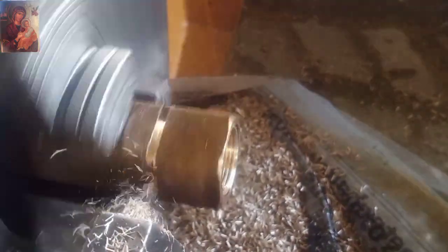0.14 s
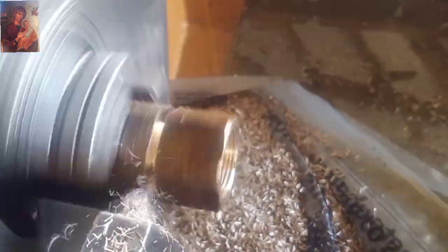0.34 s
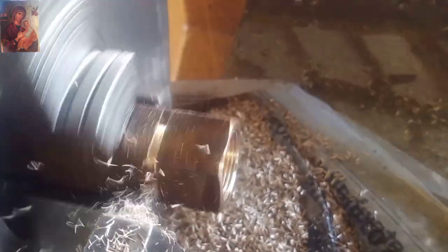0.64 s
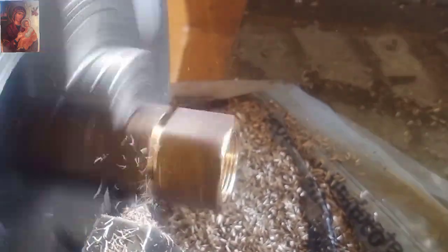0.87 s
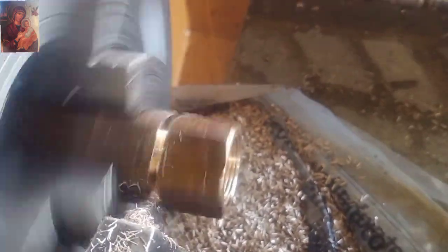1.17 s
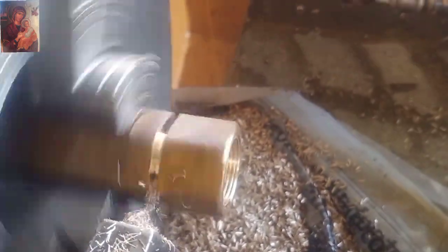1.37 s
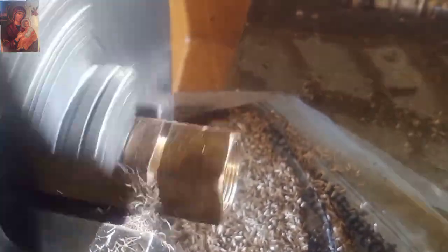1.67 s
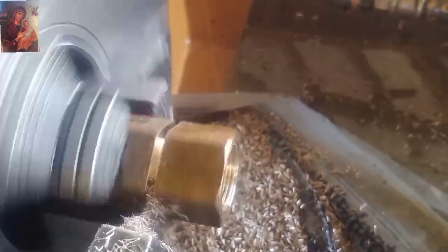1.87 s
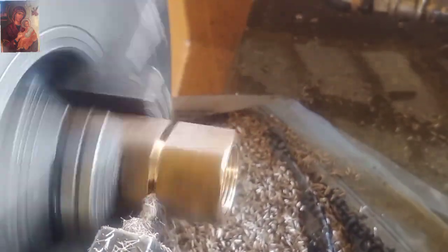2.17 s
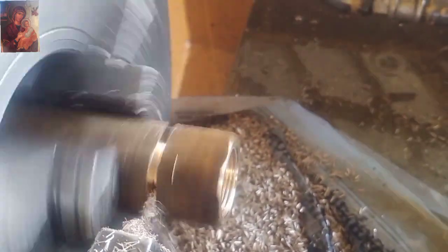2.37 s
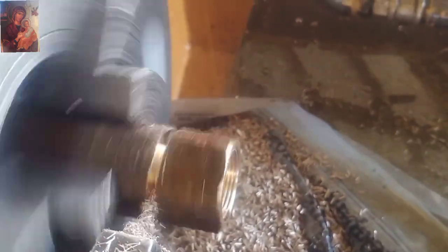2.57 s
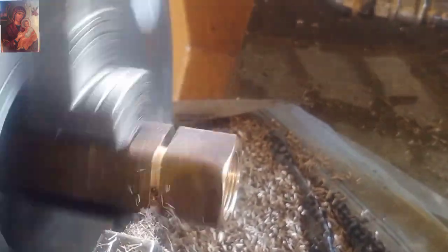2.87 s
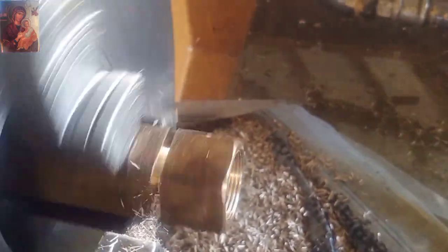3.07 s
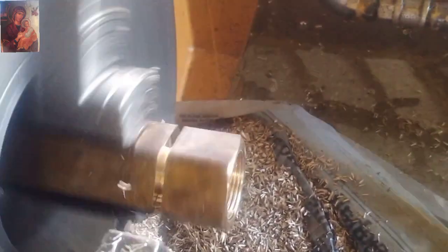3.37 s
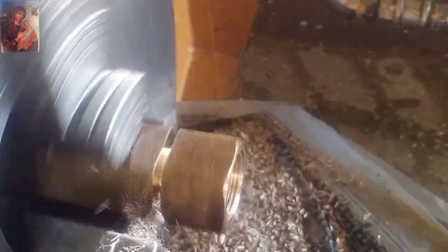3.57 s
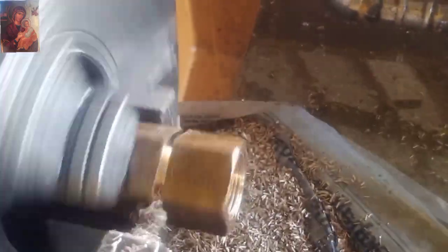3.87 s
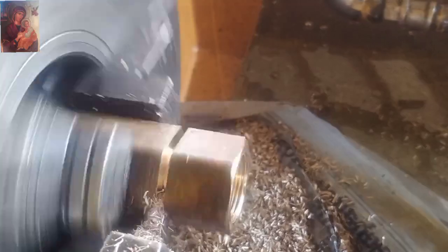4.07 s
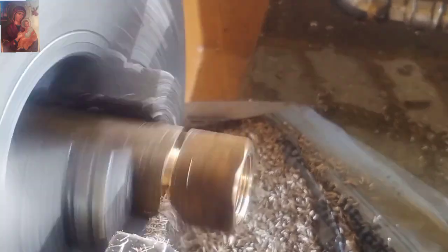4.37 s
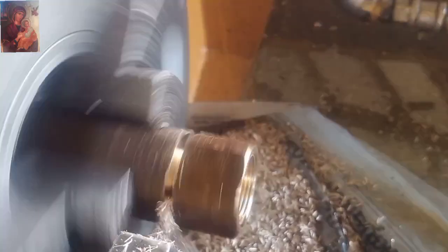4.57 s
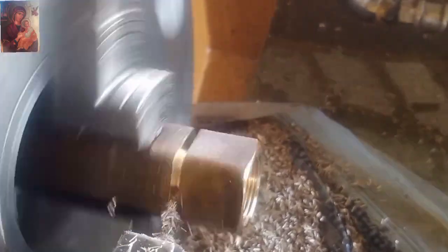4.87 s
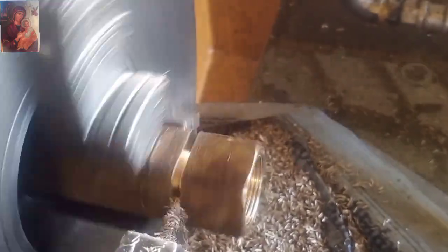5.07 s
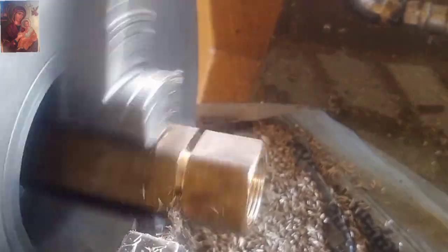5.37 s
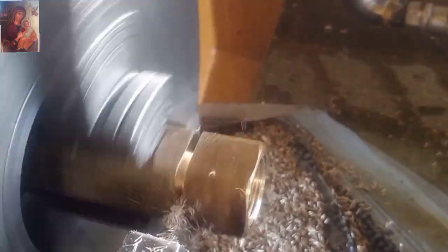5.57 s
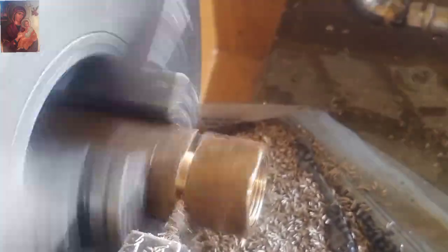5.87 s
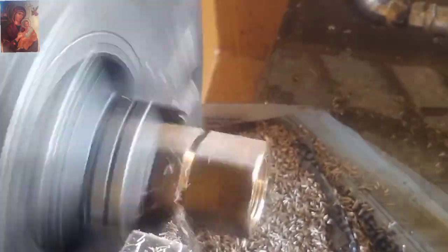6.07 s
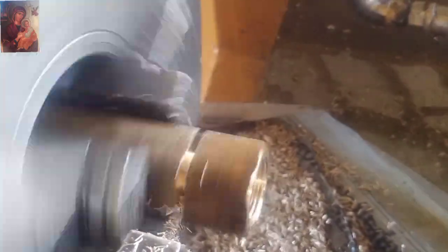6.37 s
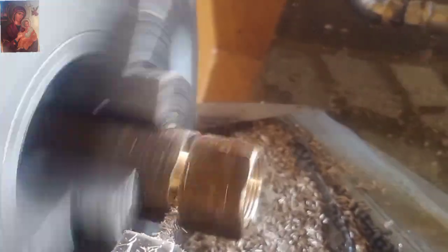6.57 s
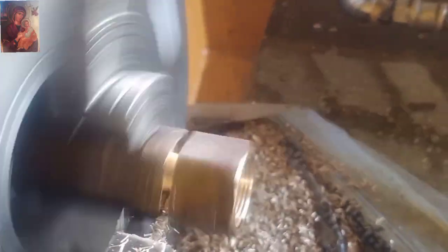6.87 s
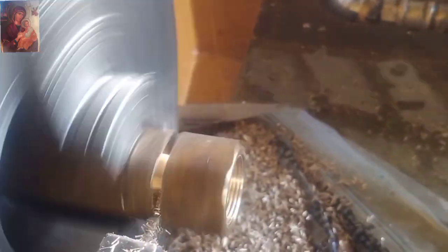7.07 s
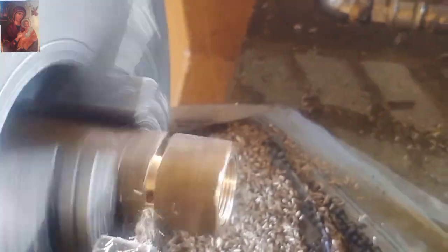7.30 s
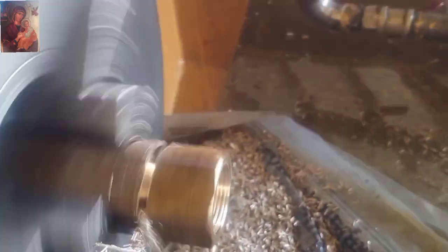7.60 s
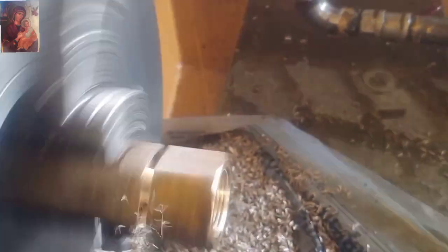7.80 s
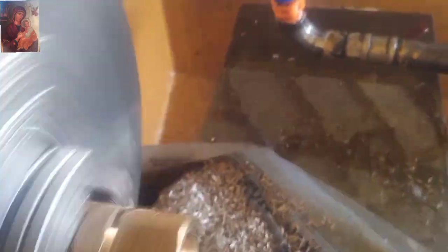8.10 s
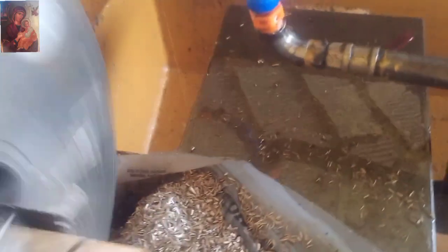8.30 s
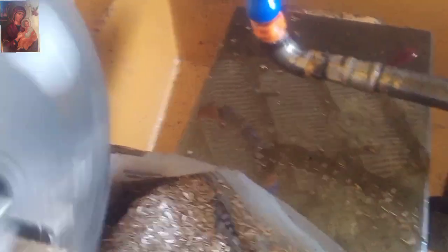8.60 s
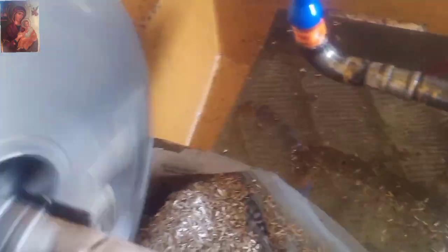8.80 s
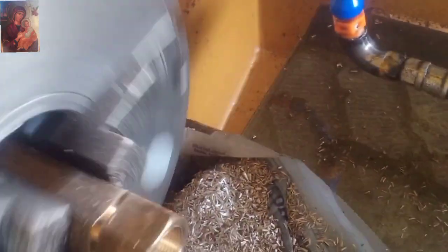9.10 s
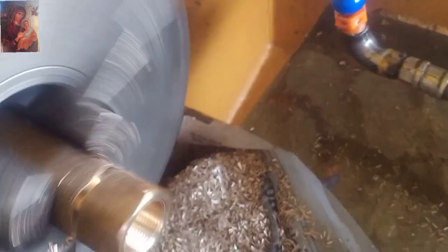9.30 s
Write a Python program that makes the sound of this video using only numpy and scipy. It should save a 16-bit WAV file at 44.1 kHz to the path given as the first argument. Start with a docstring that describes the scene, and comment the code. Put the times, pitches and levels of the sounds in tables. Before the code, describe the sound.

A harsh, breaking screech of metal against a cutting blade comes in uneven bursts for about six seconds, with crumbling brass chips hissing and brief purer tones inside it. Steady headstock hum and gear rattle fill the gaps and then take over. After another quick squeal, the idle machine keeps turning, softer, knocking about ten times a second, with soft low puffs and tiny ringing clinks. Close workshop pickup, short dense reflections, nearly all in the left channel.

```python
"""At a lathe, a brass fitting is parted off, heard on the left channel with a very faint copy on the right.
The blade sticks and slips a few thousand times a second: a squeal, made of ragged overtones through the blade's
modes, swoops down with each push of the feed, frays at its extremes and now and then locks near the lowest mode.
Chips hiss and sizzle as clumpy filtered noise. The headstock's noise bands and narrow tones drone throughout,
and remain with faint hiss, knocks, puffs of air and clinks as the microphone moves away."""
import sys
import numpy as np
from scipy import signal
from scipy.fft import rfft, irfft, next_fast_len
from scipy.io import wavfile
from scipy.ndimage import uniform_filter1d, map_coordinates

SR = 44100
rng = np.random.default_rng(int(sys.argv[2]) if len(sys.argv) > 2 else 0)


def transcribe(u):
    """Save the signal u as a 16-bit wav file named by the first command-line argument.

    u: samples, shape (n,) or (channels, n), limited to [-1, 1]; the rate is SR.
    q: integer samples, one column per channel.
    """
    v = np.clip(np.atleast_2d(u).T, -1, 1)
    q = np.round(v * 32767).astype(np.int16)
    wavfile.write(sys.argv[1], SR, q)


N = 416739

# the chatter locks near the blade's lowest mode: (time [s], length [s], pitch [Hz], relative level [dB])
BLADE_LOCKS = [(0.307, 0.025, 2142, -16), (0.414, 0.039, 2163, -14), (0.491, 0.033, 2103, -15.5),
               (0.83, 0.038, 2105, -18.5), (1.142, 0.027, 2151, -21), (1.437, 0.042, 2138, -15.5),
               (1.818, 0.03, 2154, -15.5), (2.031, 0.026, 2168, -18), (2.132, 0.04, 2165, -18.5),
               (2.609, 0.018, 2140, -13), (2.713, 0.029, 2127, -13.5), (2.892, 0.029, 2133, -19.5),
               (2.982, 0.058, 2108, -17), (3.275, 0.044, 2121, -18), (3.619, 0.017, 2097, -15.5),
               (4.287, 0.02, 2132, -16.5), (4.614, 0.046, 2105, -17.5), (4.895, 0.025, 2135, -15.5),
               (4.941, 0.028, 2068, -14.5), (5.011, 0.021, 2114, -14), (5.045, 0.034, 2104, -15.5),
               (5.16, 0.031, 2134, -14.5), (5.219, 0.021, 2084, -18), (5.817, 0.041, 2135, -16.5),
               (5.876, 0.041, 2092, -15), (7.429, 0.027, 2095, -16.5), (7.556, 0.027, 2136, -17)]
# what the slip rate decides: (slip rate [Hz], relative squeal level [dB], relative roughness [0-1],
# relative chip hiss level [dB], relative chip sizzle level [dB])
BITE_BY_RATE = [(1200, -27, 0.65, -27.5, -28), (1603.7, -24, 0.72, -28, -28.5),
                (2133, -20.5, 0.5, -27.5, -30.5), (2477, -22, 0.32, -28, -29),
                (2964, -19.5, 0.62, -28, -32), (3546, -25, 0.72, -26.5, -36),
                (4103, -31, 0.7, -26.5, -33.5), (4608, -48, 0.99, -28, -34)]

SPINDLE_HZ = 10.5
TOP_HZ = 15780  # upper limit of the overtones and of the final band
GRAZE_HZ = 4057  # slip rate as the edge just touches
CLEAR_HZ = BITE_BY_RATE[-1][0]  # slip rate with the edge clear of the work


def amp(db):
    """Decibels to gain."""
    return 10 ** (np.asarray(db) / 20)


def unit(x):
    """Scale to rms 1."""
    return x / np.sqrt(np.mean(x ** 2) + 1e-20)


def clock():
    """The time of each sample in seconds."""
    return np.arange(N) / SR


def wobble(rate):
    """A smooth random curve with `rate` knots a second."""
    knots = rng.standard_normal(int(N * rate / SR) + 4)
    return map_coordinates(knots, [clock() * rate])


def filtered(x, response):
    """Pass x through a complex response of frequency."""
    m = next_fast_len(N + SR // 2)
    spectrum = rfft(x, m) * response(np.fft.rfftfreq(m, 1 / SR))
    return irfft(spectrum, m)[:N]


def colour(points):
    """The response of (frequency [Hz], level [dB]) points joined on a log axis."""
    f, db = np.transpose(points)
    return lambda hz: amp(np.interp(np.log(hz + 1), np.log(f + 1), db, left=-120, right=-120))


def resonances(modes):
    """The summed causal response of (frequency [Hz], width [Hz], level [dB]) modes."""
    return lambda f: sum(amp(db) * 1j * f * w / (c * c - f * f + 1j * f * w) for c, w, db in modes)


def noise(response):
    """Noise of rms 1 through a response."""
    return unit(filtered(rng.standard_normal(N), response))


def gate(s, length, edge):
    """A window with soft edges, all in seconds."""
    t = clock()
    return np.clip(np.minimum(t - s, s + length - t) / edge + .5, 0, 1)


def swells(rows, edge):
    """The gain of (time [s], length [s], level [dB]) events with soft edges."""
    return sum(amp(db) * gate(s, length, edge) for s, length, db in rows)


def bite(hz):
    """Squeal level, roughness, hiss level and sizzle level at a slip rate."""
    rate, *cols = np.transpose(BITE_BY_RATE)
    return [np.interp(hz, rate, c) for c in cols]


def feed():
    """Each push eases in and out on a parabola; the deeper the bite, the slower the slips, and the slowest rules."""
    # pushes of the hand feed: (start [s], deepest [s], end [s], lowest slip rate [Hz], squeal gain [dB],
    # roughness factor, chip gain [dB], relative sinking of the headstock's drone [dB])
    pushes = [(-0.6, 0.096, 0.7, 2495, 0.5, 0.7, -0.5, 19.5), (-0.03, 0.422, 0.9, 2135, 1, 0.95, 0, 19),
              (0.3, 0.68, 1.04, 1603, 0, 1.03, 0.5, 18), (1.25, 1.449, 1.74, 2233, 0.5, 1, 1, 14.5),
              (1.512, 1.849, 2.5, 2372, 0, 1.03, -0.5, 15.5),
              (1.699, 2.12, 2.56, 2309, 0, 0.89, -1.5, 15.5), (1.9, 2.691, 2.87, 2114, 0, 1.07, -1, 20.5),
              (2.945, 2.98, 3.15, 2130, -7.5, 1.26, -4, 3.5), (3.505, 3.76, 4.075, 1200, -1, 0.98, 0.5, 22),
              (4.148, 4.42, 4.8, 1378, 0, 0.89, 2, 19), (4.549, 5.02, 5.6, 2097, -1, 1.1, 1.5, 13.5),
              (4.75, 5.148, 5.65, 2150, 1.5, 1.17, -1.5, 18.5),
              (5.589, 5.879, 6.04, 2118, 1, 0.9, 0.5, 14.5), (5.7, 5.981, 6.35, 2800, -2.5, 1, 1, 8.5),
              (5.9, 6.198, 6.34, 2900, 1, 1.05, -1, 7), (7.254, 7.499, 7.67, 1808, -0.5, 1.11, 0, 7.5)]
    release_hz_per_s = 3992  # rise of the slip rate as the edge comes clear
    t = clock()
    start, deepest, end, lowest_hz, *manner, sink_db = np.transpose(pushes)[:, :, None]
    half_length = np.where(t < deepest, deepest - start, end - deepest)
    off = np.minimum(np.abs(t - deepest) / half_length, 1)
    outside = np.maximum(np.maximum(start - t, t - end), 0)
    rates = lowest_hz + (GRAZE_HZ - lowest_hz) * off ** 2 + release_hz_per_s * outside
    ruling = rates.argmin(axis=0)
    gain_db, coarse, chip_db = [uniform_filter1d(c[ruling, 0], size=1500) for c in manner]
    sink = np.max(sink_db * (1 - off ** 2.47), axis=0)
    return np.minimum(rates.min(axis=0), CLEAR_HZ), gain_db, coarse, chip_db, sink


def dips():
    """0-1: a brief dip around each lock, lagging it slightly."""
    lag_s, edge_s = 0.013, 0.064
    return np.minimum(sum(gate(s + lag_s, length, edge_s) for s, length, *_ in BLADE_LOCKS), 1)


def moved_away():
    """0-1: how far the microphone has moved off."""
    start_s, length_s = 8.09, 1.0
    return np.clip((clock() - start_s) / length_s, 0, 1)


def chatter(hz, gain_db, coarse):
    """Slip rate, level and roughness; a lock pulls the rate near the mode and makes the tone purer."""
    lock_rough, lock_edge_s = 0.1317, 0.0136
    waver, waver_hz, waver_peak_s = 0.045, 9.85, 0.045  # swing as a fraction; about once a turn
    db, rough = bite(hz)[:2]
    db = db + gain_db
    rough = rough * coarse
    free = np.interp(hz, [2150, 2350], [.25, 1])  # near its mode the blade holds the rate steadier
    hz = hz * (1 + waver * free * np.cos(2 * np.pi * waver_hz * (clock() - waver_peak_s)))
    for s, length, lock_hz, lock_db in BLADE_LOCKS:
        hold = gate(s, length, lock_edge_s)
        hz = hz + hold * (lock_hz - hz)
        db = db + hold * (lock_db - db)
        rough = rough + hold * (lock_rough - rough)
    return hz, db, np.clip(rough, 0, 1)


def enclosure(x):
    """The chuck, guard and chip tray throw back a dense, short echo."""
    t60_s, wet_db = 0.11, -3
    t = np.arange(SR // 8) / SR
    tail = rng.standard_normal(len(t)) * amp(-60 * t / t60_s) * (t > .002)
    echo = signal.fftconvolve(x, tail / np.linalg.norm(tail))[:N]
    return x + amp(wet_db) * echo


def slip_wave(hz, rough):
    """Stick-slip motion: a jittering fundamental with overtones that come and go, and slips of uneven size."""
    jitter, drift = .11, .018  # fast and slow pitch wander
    fade_db, grain, flutter_db, uneven = 4.5, 0.37, 4, 0.57
    snap = np.interp(hz, [1700, 2100], [1.13, 1])  # slow slips let go more abruptly
    rough = rough * np.interp(hz, [1300, 2100], [1.25, 1])  # slow slips are made more ragged
    hz = hz * (1 + jitter * rough ** 1.6 * wobble(1100) + drift * rough * wobble(70))
    phase = 2 * np.pi * np.cumsum(hz) / SR
    # a locked blade swings almost as a sine
    sharpness = np.interp(rough, [.16, .3], [.12, .85])
    overtones = 0
    for k in range(2, 9):
        tone = np.cos(k * phase + .5 * wobble(500)) * (k * hz < TOP_HZ)
        weight = 1.15 if k == 2 else 1
        # the slips keep changing shape, so each overtone comes and goes
        overtones = overtones + weight * tone * amp(fade_db * wobble(90)) * (1 + grain * wobble(400))
    slips = np.cos(phase) * amp(flutter_db * rough * wobble(160)) + snap * sharpness * overtones
    return slips * (1 + uneven * rough * wobble(1800)), hz, rough


def squeal(hz, gain_db, coarse):
    """Uneven slips ring the blade; its modes sing as the slip rate sweeps through them."""
    # modes of blade, holder and work: (frequency [Hz], width [Hz], relative level [dB])
    blade_modes = [(2106, 73, 5.5), (2452, 28, 3.5), (2658, 43, -2), (2807, 56, -3), (2990, 78, -3.5),
                   (2950, 89, -5.5), (3577, 143, -5.5), (4120, 127, -5.5), (7520, 550, -26),
                   (8360, 154, -11.5), (13850, 500, -11.5), (14400, 400, -21)]
    # how well the blade radiates: (frequency [Hz], relative level [dB])
    radiation = [(400, -50), (1100, 5), (1700, 2.5), (2050, -2.5), (3600, 0.5), (4200, -10.5), (4900, -10),
                 (5600, -5), (6800, -5), (7400, 1), (8800, -2.5), (10500, -26.5), (13000, -4.5),
                 (16000, -10)]
    direct_db, stutter_db, ring_db, rub_db, trim_db = -17, 0.83, -9.0, -41, -0.26
    hz, db, rough = chatter(hz, gain_db, coarse)
    slips, hz, rough = slip_wave(hz, rough)
    body = lambda f: (amp(direct_db) + resonances(blade_modes)(f)) * colour(radiation)(f)
    voice = enclosure(filtered(slips, body))
    # friction feeds the vibration up to a limit, wherever its pitch lies
    swing = np.sqrt(np.abs(uniform_filter1d(voice ** 2, size=1100)) + 1e-9)
    steady_voice = voice / swing * amp(stutter_db * wobble(85))
    # the scrape keeps the lowest mode ringing under the glides
    ring = noise(lambda f: resonances([(2135, 110, 0)])(f) ** 2)
    scrape = amp(ring_db) * np.sqrt(rough) * np.interp(hz, [1700, 2100], [0.73, 1])
    rubbing = amp(rub_db) * (1 - moved_away())
    return (steady_voice + scrape * ring) * amp(db + trim_db) + rubbing * ring


def patchy(x, depth_db):
    """Each chip has its own colour: random gains in patches of pitch and time, then rms 1."""
    z = signal.stft(x, nperseg=256)[2]
    field = uniform_filter1d(rng.standard_normal(z.shape), size=4, axis=0)
    field = uniform_filter1d(field, size=6, axis=1)
    return unit(signal.istft(z * amp(depth_db * unit(field)), nperseg=256)[1][:N])


def chips(hz, gain_db, dip):
    """Brass crumbles off the edge in clumps, varying gently with the turn; the free-running machine hisses evenly."""
    # sprays of chips: (time [s], relative level [dB])
    sprays = [(0.559, -14), (0.592, -13), (1.719, -11), (1.888, -8), (2.071, -5), (2.256, 0), (3.842, -11),
              (5.739, 0), (5.773, -2)]
    # noise colours of cutting hiss, chip sizzle and idle hiss: (frequency [Hz], relative density [dB per Hz])
    hiss_colour = [(1350, -27.5), (2300, -1.5), (2480, 3.5), (2660, 2), (3010, 4.5), (3460, -2.5),
                   (3730, 0), (4050, -7.5), (4370, -0.5), (5350, -6.5), (7100, 2.5), (10100, -6.5),
                   (12000, -14.5), (15600, -26), (22000, -120)]
    sizzle_colour = [(9000, -57), (11000, -16.5), (12200, -8), (13500, -2), (14300, -4.5), (14700, 1.5),
                     (15700, -13)]
    idle_colour = [(1530, -24), (2600, 1), (3320, -8), (3400, 1), (3940, -7), (5060, -10), (6410, 2),
                   (9470, -7.5), (10800, -9), (12000, -8), (15600, -34), (22000, -120)]
    half_turn_db, turn_db, surge_db, clump_db, grain_db = -0.2, 1.0, 1.85, 3.0, 2.2
    cutting_db, idle_db, sizzle_db, spray_db = 0.6, -2, 2.0, -15
    hiss_away_db, sizzle_away_db, dip_db = -7.5, -4.5, -3
    hiss, sizzle = bite(hz)[2:]
    depth = np.interp(sizzle, [-35, -28], [.25, 1])
    angle = 2 * np.pi * SPINDLE_HZ * clock()
    turn = half_turn_db * np.cos(2 * angle + 0.33 * wobble(2.301)) + turn_db * np.cos(angle + 2.3)
    clumps = depth * (turn + surge_db * wobble(35) + clump_db * wobble(130) + grain_db * wobble(900))
    away = moved_away()
    clear = np.interp(hz, [GRAZE_HZ, CLEAR_HZ], [0, 1])  # between pushes the edge only rubs
    idle = np.clip(0.64 * clear + away, 0, 1)
    cutting = patchy(noise(colour(hiss_colour)) * amp(0.35 * clumps), depth_db=2.5)
    # crossfade from cutting to idle hiss by power
    low = amp(cutting_db) * np.sqrt(1 - idle) * cutting
    low = low + amp(idle_db) * np.sqrt(idle) * noise(colour(idle_colour))
    low = amp(hiss + hiss_away_db * away) * low
    high = patchy(noise(colour(sizzle_colour)) * amp(clumps), depth_db=1.5)
    high = amp(sizzle + sizzle_db + sizzle_away_db * away) * high
    spray_gain = sum(amp(db + spray_db) * gate(s, 0.0065, 0.0061) for s, db in sprays)
    spray = patchy(noise(colour(sizzle_colour)) + .5 * noise(colour(hiss_colour)), depth_db=5.0)
    return amp(gain_db * (1 - clear) + dip_db * dip) * (low + high) + spray_gain * spray


def headstock(sink, dip):
    """Gears hum and rattle in the casing, surging unevenly; the sound sinks with each push, the bass most."""
    # noise bands of drone, deep rumble and gear mesh: (frequency [Hz], relative density [dB per Hz])
    drone_colour = [(30, -45), (80, -32), (110, -14), (135, -5), (170, -11), (215, 3), (265, 0),
                    (340, -7.5), (450, -4.5), (580, -14)]
    rumble_colour = [(18, -22), (45, -17), (58, -11), (66, 8), (78, -12), (105, -1.5), (135, 6.5), (180, 1),
                     (300, -40)]
    gear_colour = [(250, -100), (450, -5), (730, 4), (1000, 2), (1300, 1), (1600, 1), (2000, 0),
                   (2500, -18), (3200, -35), (4200, -36)]
    # narrow tones of the gears and casing: (frequency [Hz], width [Hz], relative level [dB])
    drone_tones = [(217.6, 5.94, 4), (248.6, 6.9, -11), (299.3, 17, -10.5)]
    gear_tones = [(509.4, 7.2, 4.5), (604.4, 22.5, -2.5), (668, 4.5, -4.5), (734.6, 17, 5.5),
                  (959, 23.5, 6.5), (992, 9.8, -8), (1323, 5.8, 2.5), (1460, 3.9, -10), (1842, 17.4, 1),
                  (2096, 38, -1.5), (2150, 18.4, -4), (2800, 35, -35)]
    drone_db, hum_db, deep_db, gear_db, tone_db = -39, -40.0, -47, -31.0, -30
    hum_sink, deep_sink, gear_sink = 0.89, 1.46, 0.61  # shares of the sinking
    dip_db, away_db = 5, -3.0
    turn_db, surge_db, rattle_db = 0.36, 1.15, 0.97
    sink = sink + dip_db * dip + 0.11 * sink * wobble(18)
    turn = np.cos(2 * np.pi * SPINDLE_HZ * clock() + 2.0 * wobble(2.19))
    low = amp(drone_db - sink) * noise(colour(drone_colour))
    low = low + amp(hum_db - hum_sink * sink) * noise(resonances(drone_tones))
    low = low + amp(deep_db - deep_sink * sink) * noise(colour(rumble_colour))
    casing_band = colour([(200, -30), (450, 0), (3000, 0), (6000, -30)])
    casing = lambda f: resonances(gear_tones)(f) * casing_band(f)
    mesh = amp(gear_db) * noise(colour(gear_colour)) + amp(tone_db) * noise(casing)
    low_gain = amp(away_db * moved_away() + 1.3 * wobble(22))
    unsteady_db = turn_db * turn + surge_db * wobble(24) + rattle_db * wobble(150)
    return low_gain * low + amp(unsteady_db - gear_sink * sink) * mesh


def whistle():
    """A high mode of the edge rings thinly in the middle of the cut."""
    # (time [s], length [s], level [dB])
    whistle_swells = [(2.8, 0.16, -37.5), (3.15, 0.2, -45), (3.65, 0.52, -49), (4.72, 0.12, -39),
                      (4.95, 0.43, -43), (5.38, 0.19, -34), (5.85, 0.61, -47)]
    mode = lambda f: resonances([(10578, 25, 0)])(f) ** 2
    return swells(whistle_swells, edge=0.07) * noise(mode)


def knocks():
    """About once a turn, backlash lets the unloaded teeth slap, and the casing rings briefly."""
    # runs of knocks: (first [s], end [s], gap [s], first mean level [dB], fading [dB per s])
    runs = [(6.816, 7.21, 0.0955, -25.5, 2), (7.951, 9.35, 0.098, -24, 11)]
    t60_s, spread_db = 0.085, 1.8
    t = clock()
    slaps = 0
    for first, last, gap, db, fade in runs:
        for s in np.arange(first, last, gap):
            blow_db = db - fade * (s - first) + rng.normal(0, spread_db)
            slaps = slaps + amp(blow_db - 60 * np.abs(t - s) / t60_s) * (t > s)
    return slaps * noise(resonances([(735, 130, -1.7), (965, 116, -0.3), (2030, 280, -0.17)]))


def draught():
    """Air off the chuck's jaws fans the microphone in low puffs of noise."""
    # (time [s], length [s], relative level [dB])
    puffs = [(8.27, 0.05, -40), (8.4, 0.092, -44), (8.62, 0.17, -36.5)]
    air = noise(colour([(18, -9), (45, -9), (65, 2), (120, -7), (220, -13)]))
    return amp(-1) * swells(puffs, edge=0.06) * air


def clinks():
    """Stray chips land on the machine and ring briefly."""
    # (time [s], relative peak level [dB])
    landings = [(8.785, -28), (8.919, -24.5), (9.125, -28), (9.283, -26)]
    level_db, t60_s = -4, 0.088
    t = clock()
    strikes = sum(amp(db + level_db - 60 * np.abs(t - s) / t60_s) * (t > s) for s, db in landings)
    return strikes * noise(resonances([(2980, 123, -2), (3460, 260, -14), (6700, 1000, -8)]))


def scene():
    """The feed drives squeal and chips; everything reaches one microphone."""
    hz, gain_db, coarse, chip_db, sink = feed()
    dip = dips()
    cut = squeal(hz, gain_db, coarse) + chips(hz, chip_db, dip) + whistle()
    machine = headstock(sink, dip) + knocks() + draught() + clinks()
    mono = cut + machine
    return np.array([mono, mono])


def record(dry):
    """The microphone feeds the left channel, the right gets a very quiet copy; peaks round off, then a band limit."""
    channel_db, top = [[6], [-45]], 0.84
    x = amp(channel_db) * dry
    x = x / (1 + (x / top) ** 8) ** (1 / 8)
    return np.array([filtered(channel, lambda hz: hz < TOP_HZ) for channel in x])


dry = scene()
out = record(dry)
transcribe(out)
```